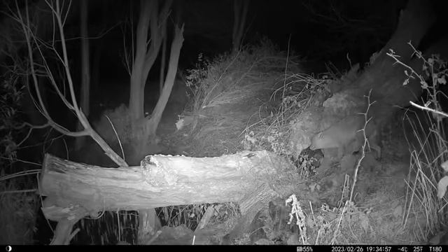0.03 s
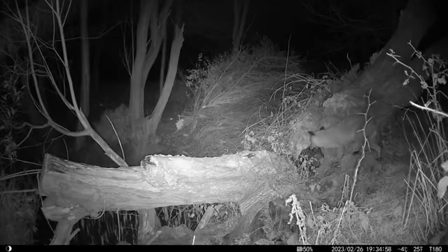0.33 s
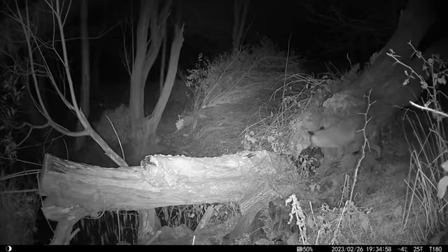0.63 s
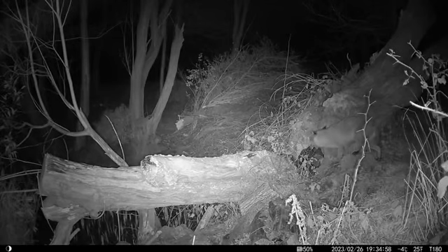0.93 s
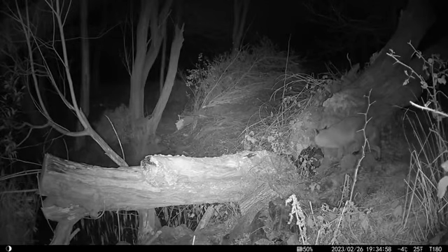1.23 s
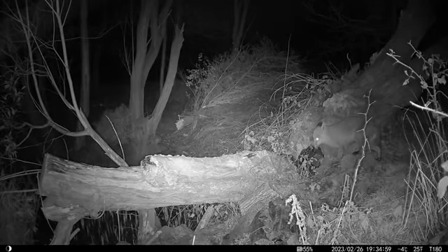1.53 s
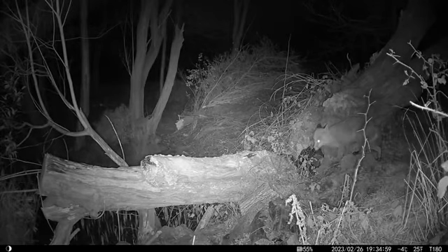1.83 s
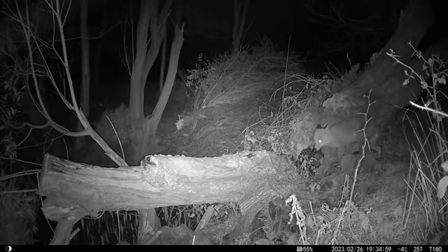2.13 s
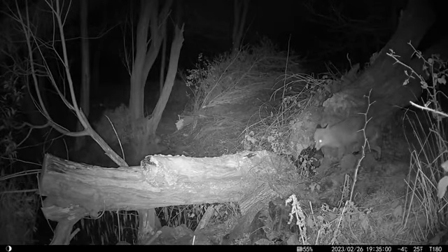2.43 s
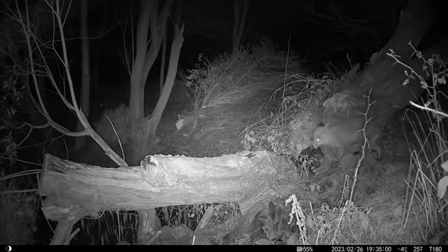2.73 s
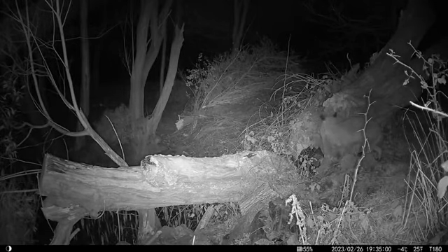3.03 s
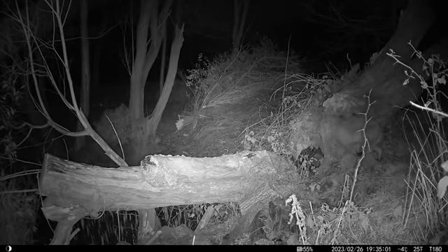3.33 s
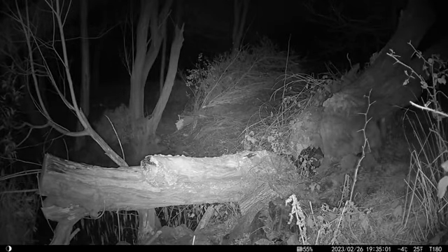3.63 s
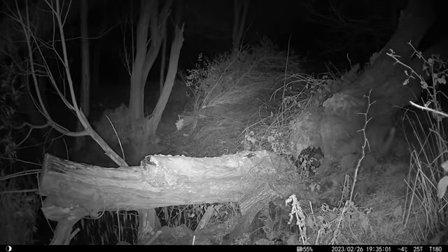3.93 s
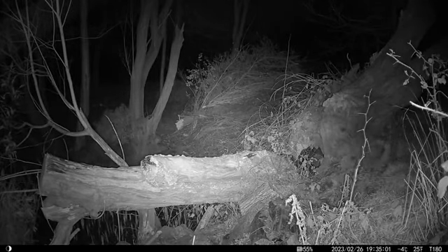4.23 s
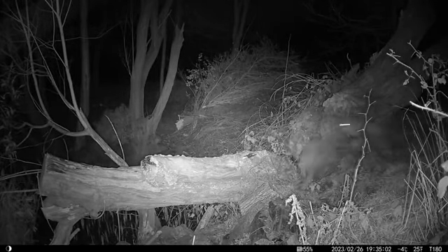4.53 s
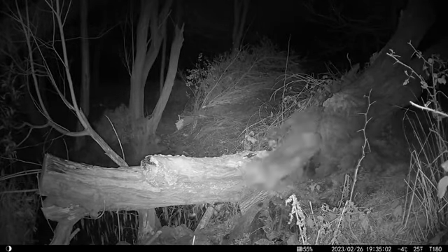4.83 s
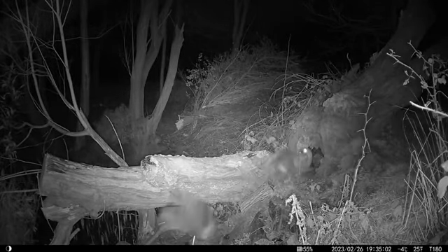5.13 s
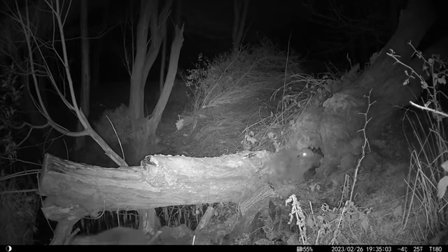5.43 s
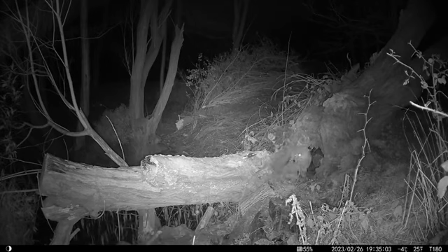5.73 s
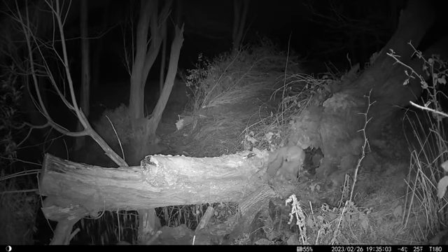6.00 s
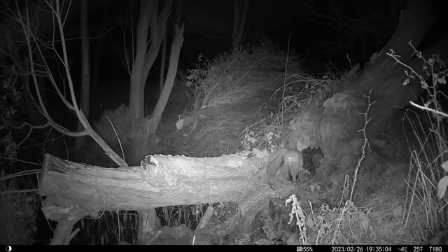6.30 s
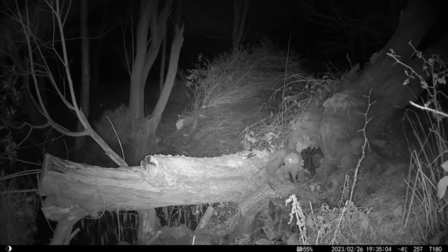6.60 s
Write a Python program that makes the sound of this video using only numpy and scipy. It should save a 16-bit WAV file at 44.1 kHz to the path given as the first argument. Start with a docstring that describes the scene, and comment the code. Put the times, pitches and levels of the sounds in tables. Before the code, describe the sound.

Steady microphone hiss with a low rumble runs throughout, with a few faint high ticks in the first three seconds. A tiny whine comes at the very start. From about 1 to 1.8 seconds a fox gives a soft, quavering, hoot-like wail in three short phrases. After a lull, thin whines, small yaps and a hoarse nasal squeal come between 3.4 and 4 seconds. A twig cracks sharply just after 4 seconds and two foxes start to scuffle. Dry leaves crackle in surges, claws scrape on a log, paws thud dully and more twigs snap, mixed with bursts of raspy, rattling yaps and a faint rumble from the microphone mount. The fight is loudest from about 4.4 to 5.5 seconds, then eases. A last, longer rattling chatter runs from about 6.1 to 6.7 seconds and fades, with light rustling and two small snaps.

```python
"""Foxes quarrelling at night

Two foxes by a log in a wood, heard through a trail camera's hissy microphone. A hoot-like wail and
thin whines lead to rattling gekker calls: vocal folds ringing in throat and muzzle. In the scuffle
dry leaves crackle, paws thud and twigs snap; a last long gekker fades out."""
import sys
import numpy as np
from scipy import signal
from scipy.fft import rfft, irfft, next_fast_len
from scipy.io import wavfile

SR = 44100
rng = np.random.default_rng(int(sys.argv[2]) if len(sys.argv) > 2 else 0)


def dump(signal):
    """Clip the signal to [-1, 1] and save it as 16-bit WAV at the path in sys.argv[1]."""
    limited = np.clip(np.atleast_2d(signal).T, -1, 1)
    pcm = np.round(limited * 32767).astype(np.int16)
    wavfile.write(sys.argv[1], SR, pcm)


N = 302526
TIME_S = np.arange(N) / SR

# bouts of yaps: start/s, end/s, count, first level/dB, last level/dB, pitch/Hz, mouth resonance/Hz,
# glide/octaves, rasp/dB re voice, rasp centre/Hz, roughness, yap half-length/s
GEKKER_BOUTS = [(3.4, 3.3999, 1, -45.5, -45.5, 1634, 2150, 0, -16, 8800, 0.39, 0.003),
                (3.528, 3.528, 1, -60.5, -60.5, 1420, 2040, 0, -6, 9300, 0.2, 0.0032),
                (4.023, 4.0757, 3, -65, -49, 1157, 2400, -0.26, -9, 8400, 0.75, 0.0029),
                (4.2856, 4.2885, 2, -43.5, -47, 1805, 1950, 0.37, -10.5, 7700, 0.55, 0.0029),
                (4.4933, 4.5305, 3, -47.5, -40, 1945, 2170, 0.15, -18, 8400, 0.68, 0.0026),
                (4.6985, 4.6985, 1, -39, -38.5, 2530, 2570, 0, 4, 7500, 0.45, 0.0016),
                (4.7101, 4.7336, 3, -39.5, -38, 1805, 2140, 0.08, -1, 7000, 0.43, 0.0022),
                (4.748, 4.7815, 4, -40, -44, 1258, 2030, -.7, -11, 7400, 0.63, .0032),
                (4.7946, 4.7946, 1, -47.5, -49, 1090, 2000, 0, -17, 8100, 0, 0.0052),
                (5.286, 5.2945, 2, -44.5, -48, 1240, 1900, 0.15, -10, 8500, 0.9, 0.0031),
                (5.3962, 5.3958, 1, -36, -34.5, 2530, 2720, 0, -3.5, 8000, 0.62, 0.0024),
                (5.424, 5.44, 2, -47.5, -47.5, 1250, 2110, 0, -12, 8600, 1.1, 0.0055),
                (5.835, 5.835, 1, -53.5, -50, 953, 1740, 0, -15, 9000, 0.7, 0.0059),
                (6.128, 6.1506, 2, -47.5, -42.5, 1653, 1900, .05, -8.5, 5840, 0.32, 0.0022),
                (6.1766, 6.1765, 1, -36.5, -37, 2490, 2640, 0, -7, 5100, 0.58, 0.0024),
                (6.2988, 6.42, 7, -50.5, -47.5, 1264, 2140, -0.09, 0.5, 8750, 0.48, 0.0027),
                (6.4403, 6.5055, 4, -44, -44.5, 1138, 1920, 0.25, -2, 8300, 0.76, 0.0037),
                (6.5291, 6.6655, 8, -45, -52, 1048, 1050, .1, -3.5, 9550, 0.36, 0.002)]
# fox throat resonances: f/Hz, width/Hz, gain/dB
THROAT_MODES = [(990, 162, 8.5), (1562, 100, 8.5), (1896, 173, 8), (2732, 680, 6), (3270, 86, 9),
                (3970, 440, 5.5), (5040, 620, 8.5)]
# muzzle resonances: f/Hz, width/Hz, gain/dB
MUZZLE_MODES = [(4890, 170, 2.5), (6310, 320, 1), (6600, 900, -3), (8100, 360, -5), (8500, 310, -5),
                (9500, 470, -3.5)]
# wail, one curve a phrase: t/s, pitch/Hz, level/dB
WAIL_PHRASES = [
    [(0.96, 925, -72), (0.986, 904, -51), (1.004, 890, -60), (1.014, 842, -77), (1.02, 860, -61.5),
     (1.04, 877, -60.5)],
    [(1.11, 813, -69), (1.204, 849, -65.5), (1.28, 904, -66), (1.292, 950, -67), (1.334, 903, -64),
     (1.35, 951, -52), (1.382, 945, -53), (1.435, 917, -63)],
    [(1.455, 1004, -69), (1.479, 962, -55), (1.497, 993, -65.5), (1.507, 958, -66.5), (1.603, 932, -51.5),
     (1.643, 933, -51), (1.737, 908, -54), (1.785, 801, -79)],
]
# wail overtones: harmonic number, level/dB re fundamental
WAIL_OVERTONES = [(2, -25), (4, -30), (7, -28)]
# whines: start/s, length/s, first, middle, last pitch/Hz, level/dB, octave/dB, nasal/dB, jitter/fraction
WHINES = [(0.043, 0.086, 1040, 1080, 1100, -57.5, -15, -6.5, .015),
          (3.412, 0.074, 1242, 1007, 1250, -55.5, -14, -13, 0.043),
          (3.54, 0.11, 1267, 994, 1198, -55, -11, -5.5, 0.043),
          (3.759, 0.013, 1060, 1090, 1040, -60, -5, 0, .02),
          (3.796, 0.018, 1065, 1060, 1110, -63, -8, 4, 0.021),
          (4.541, 0.019, 1201, 1180, 1057, -55.5, -10, -8, .035),
          (6.23, 0.05, 1160, 1020, 1194, -56.5, -0.5, 2.5, 0.054)]
# nasal squeal: t/s, pitch/Hz, level/dB
SQUEAL_CURVE = [(3.688, 1305, -65), (3.767, 1160, -60.5), (3.845, 1220, -66), (3.9, 1335, -62),
                (3.93, 1230, -58.5), (3.975, 1110, -73)]
# churning of leaves: t/s, level/dB
CHURN_CURVE = [(3.98, -78), (4.02, -59), (4.32, -64), (4.42, -59), (4.6, -53.5), (4.78, -56), (4.98, -50.5),
               (5.44, -50), (5.6, -58.5), (5.74, -63.5), (5.9, -57.5), (6.1, -71), (6.24, -65.5),
               (6.54, -60), (6.62, -66), (6.86, -71)]
# kicks and lunges: t/s, leaves/dB, claws/dB
KICKS = [(4.387, -46.5, -64), (4.45, -45.5, -55), (4.482, -47.5, -60), (4.655, -57, -82), (4.78, -48, -55),
         (4.865, -44, -51), (4.915, -47.5, -60), (5.142, -44.5, -55.5), (5.184, -46, -54.5),
         (5.286, -44, -49.5), (5.385, -47.5, -47.5), (5.436, -44, -50), (5.53, -58, -67),
         (5.615, -57, -55.5), (5.695, -59.5, -60), (5.829, -53.5, -59.5), (5.888, -55.5, -62)]
# crisp top of the leaves: t/s, relative level/dB
CRISP_CURVE = [(4.55, -29), (4.95, -12), (5.3, -14), (5.55, -7.5), (6.35, -7.5), (6.8, 4)]
# dry leaves: f/Hz, gain/dB
LEAF_SPECTRUM = [(3500, -18.5), (5600, -19.5), (6800, -5), (8300, 0), (10000, -1.5), (11500, -1.5),
                 (13000, -9.5), (15000, -16)]
# their crisp top: f/Hz, gain/dB
CRISP_SPECTRUM = [(9000, -43), (11500, -20), (13000, 8), (14200, -3), (15200, -7), (16500, -28)]
# claws on bark and soil: f/Hz, gain/dB
SCRAPE_SPECTRUM = [(200, -3.5), (400, -3.5), (650, -6), (950, 6.5), (1350, -5.5), (1900, 2.5), (2700, 3.5),
                   (3700, -1.5), (4900, -1), (5500, -4), (8000, -6)]
# twig snaps: t/s, level/dB, resonance/Hz, decay/s
SNAPS = [(4.1437, -23, 7400, 0.00079), (4.149, -37, 6600, 0.001), (4.378, -36, 8600, 0.0031),
         (4.446, -41, 2200, .0013), (4.871, -39, 8650, 0.00044), (5.036, -34.5, 8600, 0.0043),
         (5.121, -35.5, 2180, 0.00081), (5.132, -32.5, 9300, 0.0023), (5.381, -30, 7950, 0.0007),
         (5.645, -32.5, 7350, 0.002), (6.61, -36, 11000, 0.0018), (6.778, -39.5, 11200, 0.0015)]
# landings: t/s, level/dB
THUDS = [(4.16, -66.5), (4.29, -64.5), (4.44, -56.5), (4.51, -51), (4.58, -53), (4.68, -56), (4.81, -51.5),
         (4.88, -52.5), (5.02, -64), (5.15, -50.5), (5.21, -51.5), (5.3, -51.5), (5.41, -55), (5.48, -56.5),
         (5.57, -58), (5.66, -60.5), (5.76, -67), (5.92, -66.5)]
# ground resonances: f/Hz, width/Hz, gain/dB
GROUND_MODES = [(59, 12.4, -1.5), (84.7, 12.7, 1.5), (115, 24, -2), (152, 34, -10)]
# echoes off log and trunks: delay/s, gain/dB
ECHOES = [(.0047, -15.5), (0.01, -17), (0.018, -20), (.034, -20), (0.059, -24)]
# camera mount sway: t/s, level/dB
SWAY_CURVE = [(4.2, -69), (4.26, -61), (4.44, -71), (4.5, -57), (5.12, -58), (5.18, -50), (5.59, -49.5),
              (5.62, -57), (6.28, -67.5), (6.35, -81)]
# high ticks: t/s, level/dB
TICKS = [(0.1095, -51), (0.86, -52.5), (1.117, -52.5), (2.1181, -50.5), (2.9595, -51), (3.128, -53.5)]
# thin whistles: start/s, end/s, f/Hz, level/dB
WHISTLES = [(0.258, .57, 11390, -72), (2.47, 2.65, 11290, -77)]
# microphone hiss: f/Hz, gain/dB
HISS_SPECTRUM = [(12, -44), (20, 3.5), (41, -15.5), (59, -14.5), (124, -15), (174, -15), (263, -16),
                 (511, -17), (656, -17.5), (966, -19.5), (6010, -27), (11100, -28), (15000, -29.5)]


def gekker(gain_db=1.63, lead_s=0.001, scatter_db=3.3, scatter_octaves=0.121, rough_per_db=0.07):
    """Bouts of evenly spaced yaps; pitch and mouth glide together, harder-pushed yaps are hoarser."""
    out = np.zeros(N)
    for (start_s, end_s, count, first_db, last_db, pitch_hz, mouth_hz,
         glide_octaves, rasp_db, rasp_hz, bout_rough, half_s) in GEKKER_BOUTS:
        count = round(count)
        for k, at_s in enumerate(np.linspace(start_s, end_s, count)):
            place = (k - (count - 1) / 2) / max(count - 1, 1)   # -1/2 to 1/2 through the bout
            push_db = place * (last_db - first_db)
            pitch_luck, level_luck = rng.uniform(-0.996, 1, 2) * (1 - 1 / count)
            shift = 2 ** (glide_octaves * place + scatter_octaves * pitch_luck)
            rough = np.clip(bout_rough + rough_per_db * push_db, 0, 1)
            sound = yap(pitch_hz * shift, mouth_hz * shift, rasp_db, rasp_hz, rough, half_s)
            level_db = (first_db + last_db) / 2 + push_db + gain_db + scatter_db * level_luck
            add(out, at_s - len(sound) / 2 / SR - lead_s, from_db(level_db) * sound)
    return out


def yap(pitch_hz, mouth_hz, rasp_db, rasp_hz, rough, half_s, arch=0.0857):
    """A few arching, noisy fold cycles; the mouth picks a throat resonance, the muzzle adds rasp."""
    t = np.arange(-SR // 50, SR // 50) / SR
    swell = np.exp(-(t / half_s) ** 2 / 2 * np.where(t < 0, 1.7, 0.8))
    arched_hz = pitch_hz * (1 + arch * (swell - 0.8))
    phase = jittered_phase(arched_hz, jitter=0.016 + 0.0853 * rough, rate_hz=385)
    folds = harmonics(phase, count=int(SR / 4 / pitch_hz))
    source = swell * ((1 - rough) * folds + rough * rng.standard_normal(len(t)))
    mouth = resonate(resonators(source, THROAT_MODES), mouth_hz, 0.45 * mouth_hz * (0.5 + rough))
    muzzle = resonate(resonators(source, MUZZLE_MODES), rasp_hz, width_hz=1700)
    voice = unit_rms(band(mouth, 600, 3240))
    rasp = unit_rms(band(muzzle, 0.47 * rasp_hz, min(rasp_hz + 2200, 9900)))
    return (voice + from_db(rasp_db) * rasp) * np.sqrt(np.mean(swell ** 2))


def wail(gain_db=-0.8, flutter_db=3.5, quaver=0.0318, quaver_hz=27, catch_s=0.99, catch_db=-70):
    """Near-pure tone with a hoarse catch at the start; quavers when soft, steadies when pushed."""
    sounding = sum(gate(phrase[0][0], phrase[-1][0]) for phrase in WAIL_PHRASES).clip(0, 1)
    pitch_hz, level_db = curves(np.vstack(WAIL_PHRASES))
    softness = np.clip((level_db.max() - level_db) / 14, 0.1, 1)
    vibrato = 1 + quaver * softness * np.sin(2 * np.pi * quaver_hz * TIME_S)
    phase = jittered_phase(pitch_hz * vibrato, jitter=0.0074, rate_hz=59.5)
    tone = np.sin(phase) + sum(from_db(db) * np.sin(round(k) * phase) for k, db in WAIL_OVERTONES)
    breath = unit_rms(resonate(rng.standard_normal(N), hz=2500, width_hz=300))
    catch = gate(catch_s, catch_s + 0.015) * from_db(catch_db) * breath
    envelope = sounding * from_db(level_db + gain_db + flutter_db * softness * drift(26))
    return np.sqrt(2) * envelope * tone + catch


def whines(gain_db=-0.5, octave_gain_db=-4, nasal_gain_db=-6, flutter_db=3, sag_db_per_s=52):
    """Fading whimpers bent through three pitches: fundamental, octave and thin nasal overtones."""
    out = np.zeros(N)
    fade_s = 0.0087
    for start_s, length_s, first_hz, middle_hz, last_hz, db, octave_db, nasal_db, jitter in WHINES:
        t = np.arange(-fade_s, length_s + fade_s, 1 / SR)
        bend = np.polyfit([0, 0.5, 1], [first_hz, middle_hz, last_hz], 2)
        pitch_hz = np.polyval(bend, np.clip(t / length_s, 0, 1))
        phase = jittered_phase(pitch_hz, jitter, rate_hz=123)
        low = np.sqrt(2) * (np.sin(phase) + from_db(octave_db + octave_gain_db) * np.sin(2 * phase))
        high = from_db(nasal_db + nasal_gain_db) * nose(harmonics(phase))
        level_db = db + gain_db - sag_db_per_s * t + flutter_db * drift(100, len(t))
        add(out, start_s + t[0], gate(0, length_s, fade_s, t) * from_db(level_db) * (low + high))
    return out


def squeal(throat_db=-8, nose_db=-2, flutter_db=2, waver=0.02, hoarseness=0.73):
    """Mouth shut: high overtones carry a thin, hoarse, wavering sound."""
    pitch_hz, level_db = curves(SQUEAL_CURVE)
    phase = jittered_phase(pitch_hz * (1 + waver * drift(25)), jitter=0.018, rate_hz=150)
    folds = harmonics(phase) + hoarseness * rng.standard_normal(N)
    throat = unit_rms(band(resonators(folds, THROAT_MODES), 800, 3200))
    voice = from_db(throat_db) * throat + from_db(nose_db) * nose(folds, hz=8550)
    sounding = gate(SQUEAL_CURVE[0][0], SQUEAL_CURVE[-1][0])
    return sounding * from_db(level_db + flutter_db * drift(50)) * voice


def nose(folds, hz=8800):
    """High overtones ringing in the nose; rms 1."""
    ringing = resonate(resonators(folds, MUZZLE_MODES), hz, width_hz=1500)
    return unit_rms(band(ringing, 4500, 10900))


def scuffle(leaf_gain_db=2.5, crisp_gain_db=-1, scrape_gain_db=2, rise_s=0.017, decay_s=0.043):
    """Bodies churn leaves and claws scrape the log; each kick adds a surge."""
    churn_db, = curves(CHURN_CURVE)
    crisp_db, = curves(CRISP_CURVE)
    kicks_s, leaves_db, claws_db = np.transpose(KICKS)
    drag_db = -60 + 0.64 * (churn_db - churn_db.max())   # steady scraping follows the churn
    stirring = np.hypot(from_db(churn_db), surges(kicks_s, leaves_db, rise_s, decay_s))
    clawing = np.hypot(from_db(drag_db), surges(kicks_s, claws_db, rise_s, decay_s))
    fractures = crackle(3800, spread_db=1.1, clump_db=3, rubbing=0.53)
    scratches = band(crackle(1300, spread_db=2.5, clump_db=2, rubbing=0.66), 166, 11400)
    leaves = stirring * from_db(leaf_gain_db) * colour(fractures, LEAF_SPECTRUM)
    crisp = stirring * from_db(crisp_db + crisp_gain_db) * colour(fractures, CRISP_SPECTRUM)
    scrape = clawing * from_db(scrape_gain_db) * colour(scratches, SCRAPE_SPECTRUM)
    return gate(CHURN_CURVE[0][0], CHURN_CURVE[-1][0]) * (leaves + crisp + scrape)


def crackle(grains_per_s, spread_db, clump_db, rubbing):
    """Tiny fractures of uneven size over rubbing noise, swelling in clumps."""
    sizes = from_db(spread_db * np.minimum(rng.exponential(1, N), 4.5)) * rng.choice([-1, 1], N)
    grains = unit_rms(sizes * (rng.random(N) < grains_per_s / SR))
    return (grains + rubbing * rng.standard_normal(N)) * from_db(clump_db * drift(37))


def twig_snaps(gain_db=-0.5, splinter_s=0.0061, splinter_db=-19):
    """Each twig breaks with a sharp crack and a short splintering."""
    out = np.zeros(N)
    t = np.arange(SR // 20) / SR
    for at_s, level_db, hz, crack_s in SNAPS:
        envelope = np.exp(-t / crack_s) + from_db(splinter_db) * np.exp(-t / splinter_s)
        burst = envelope * rng.standard_normal(len(t))
        crack = band(resonate(burst, hz, width_hz=2600), 640, 1.24 * hz + 800, order=5)
        add(out, at_s, from_db(level_db + gain_db) * crack / np.abs(crack).max())
    return out


def paw_thuds(gain_db=0.5):
    """The ground booms under each landing."""
    landings_s, levels_db = np.transpose(THUDS)
    impacts = crackle(60, spread_db=1.5, clump_db=0, rubbing=0.81)
    boom = unit_rms(band(resonators(impacts, GROUND_MODES), 54, 190))
    return surges(landings_s, levels_db + gain_db, rise_s=0.015, decay_s=0.065) * boom


def woodland(x):
    """Direct sound plus dull echoes off log and trunks."""
    dull = band(x, 300, 6900, order=1)
    return x + sum(from_db(db) * np.interp(TIME_S - lag_s, TIME_S, dull, left=0) for lag_s, db in ECHOES)


def mount_sway():
    """The camera mount rumbles at its resonance during the scuffle."""
    level_db, = curves(SWAY_CURVE)
    sway = unit_rms(band(resonate(rng.standard_normal(N), hz=31, width_hz=6), 17, 52))
    return gate(SWAY_CURVE[0][0], SWAY_CURVE[-1][0], fade_s=0.12) * from_db(level_db) * sway


def ticks(gain_db=4, decay_s=0.0026):
    """Faint dry ticks in the high treble."""
    out = np.zeros(N)
    t = np.arange(SR // 50) / SR
    for at_s, level_db in TICKS:
        tick = band(rng.standard_normal(len(t)) * np.exp(-t / decay_s), 8000, 12200, order=2)
        add(out, at_s, from_db(level_db + gain_db) * tick / np.abs(tick).max())
    return out


def camera_noise(hiss_db=-62.5):
    """Steady microphone hiss and rumble; a thin whistle comes and goes."""
    whistle = np.zeros(N)
    for start_s, end_s, hz, level_db in WHISTLES:
        phase = jittered_phase(np.full(N, hz), jitter=0.002, rate_hz=90)
        whistle += gate(start_s, end_s, fade_s=0.04) * from_db(level_db) * np.sin(phase)
    return from_db(hiss_db) * colour(rng.standard_normal(N), HISS_SPECTRUM) + whistle


def jittered_phase(pitch_hz, jitter, rate_hz):
    """Phase/rad of a trembling pitch."""
    return 2 * np.pi * np.cumsum(pitch_hz * (1 + jitter * drift(rate_hz, len(pitch_hz)))) / SR


def harmonics(phase, count=10):
    """Equal harmonics of the vocal folds; rms 1."""
    return unit_rms(sum(np.sin(k * phase + k * k) for k in range(1, count + 1)))


def surges(times_s, levels_db, rise_s, decay_s):
    """Envelope of efforts that swell and die away; powers add."""
    power = np.zeros(N)
    t = np.arange(-SR // 10, SR // 2) / SR
    shape = np.where(t < 0, np.exp(-(t / rise_s) ** 2 / 2), np.exp(-np.abs(t) / decay_s))
    for at_s, level_db in zip(times_s, levels_db):
        add(power, at_s + t[0], (from_db(level_db) * shape) ** 2)
    return np.sqrt(power)


def drift(rate_hz, size=N):
    """Noise low-passed at rate_hz; rms about 1."""
    knots = rng.standard_normal(size // 20 + 2000)
    pole = np.exp(-40 * np.pi * rate_hz / SR)
    slow = unit_rms(signal.lfilter([1], [1, -2 * pole, pole * pole], knots))[1900:]
    return np.interp(np.arange(size) / 20, np.arange(len(slow)), slow)


def colour(x, spectrum):
    """Filter by a smooth spectrum; rms 1."""
    hz, db = np.transpose(spectrum)
    size = next_fast_len(N)
    bins_hz = np.maximum(np.fft.rfftfreq(size, 1 / SR), 1)
    gain = from_db(np.interp(np.log(bins_hz), np.log(hz), db))
    return unit_rms(irfft(rfft(x, size) * gain, size)[:N])


def resonate(x, hz, width_hz):
    """One resonance, peak gain 1."""
    r = np.exp(-np.pi * width_hz / SR)
    feedback = [1, -2 * r * np.cos(2 * np.pi * hz / SR), r * r]
    return signal.lfilter(np.array([1, 0, -1]) * (1 - r * r) / 2, feedback, x)


def resonators(x, modes):
    """Parallel resonances, signs alternating."""
    return sum((-1) ** k * from_db(db) * resonate(x, hz, width_hz)
               for k, (hz, width_hz, db) in enumerate(modes))


def band(x, low_hz, high_hz, order=3):
    sos = signal.butter(order, [low_hz, min(high_hz, 0.45 * SR)], "band", fs=SR, output="sos")
    return signal.sosfilt(sos, x)


def curves(rows):
    """Table columns at every sample."""
    times_s, *columns = np.transpose(rows)
    return [np.interp(TIME_S, times_s, column) for column in columns]


def gate(start_s, end_s, fade_s=0.0089, t=TIME_S):
    """1 from start to end, fades outside."""
    return np.clip(np.minimum(t - start_s, end_s - t) / fade_s + 1, 0, 1)


def add(out, start_s, sound):
    i = max(round(start_s * SR), 0)
    out[i:i + len(sound)] += sound[:max(N - i, 0)]


def from_db(db):
    return 10 ** (np.asarray(db) / 20)


def unit_rms(x):
    return x / np.sqrt(np.mean(x ** 2) + 1e-20)


def scene():
    """Calls and snaps echo over the scuffle and camera noise; mono."""
    foxes = wail() + whines() + squeal() + gekker()
    echoing = woodland(foxes + twig_snaps())
    return (echoing + scuffle() + paw_thuds() + mount_sway() + ticks() + camera_noise())[None]


def record(dry):
    """A brief silence at the start, then the sound fades in quickly; steep treble cut."""
    silence_s, cutoff_hz = 0.036, 15150
    fade_in = gate(silence_s, 10, fade_s=0.001)
    return signal.sosfilt(signal.ellip(12, 0.2, 70, cutoff_hz, fs=SR, output="sos"), dry * fade_in)


dry = scene()
out = record(dry)
dump(out)
```